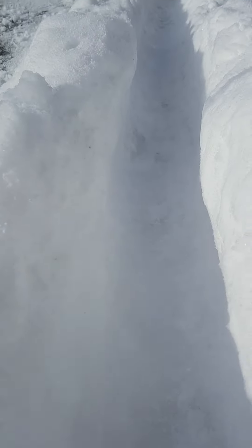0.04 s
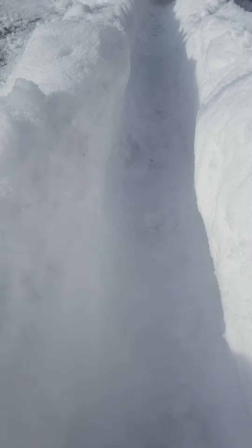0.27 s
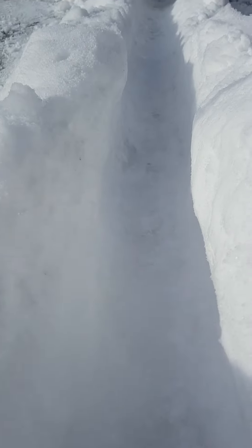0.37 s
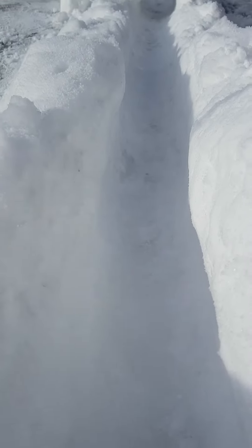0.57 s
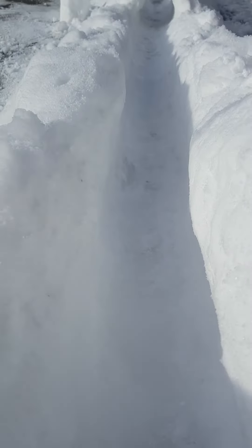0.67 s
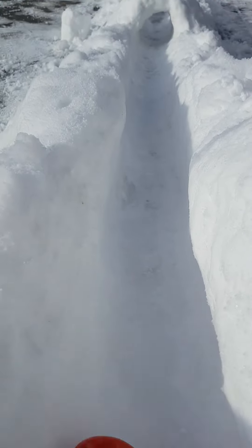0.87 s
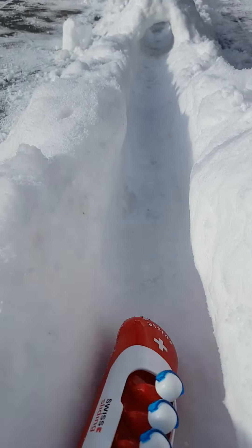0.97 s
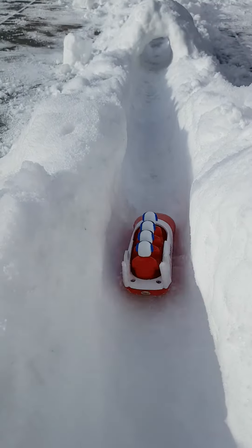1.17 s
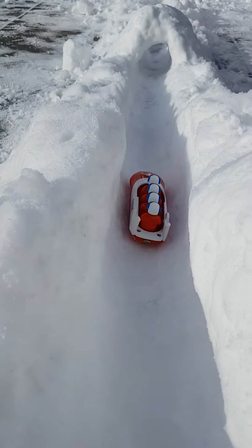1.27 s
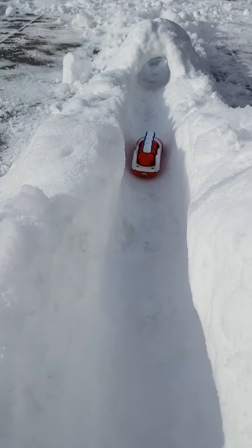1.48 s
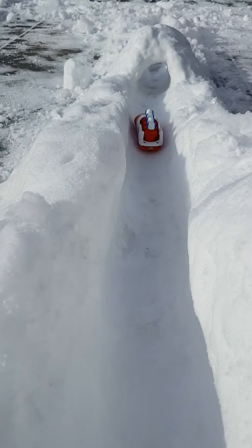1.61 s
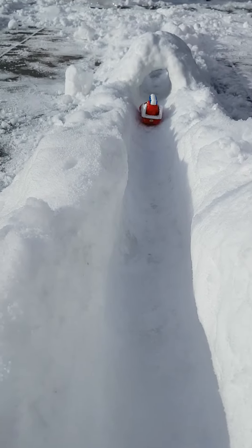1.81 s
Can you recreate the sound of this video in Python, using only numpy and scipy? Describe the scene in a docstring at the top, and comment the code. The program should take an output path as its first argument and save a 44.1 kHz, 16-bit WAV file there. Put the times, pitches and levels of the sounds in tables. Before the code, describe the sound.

A hollow plastic toy sled slides over icy snow, starting with a soft, low rumble and light bumps. From about 0.4 seconds, quick hollow knocks and plastic rattles grow louder. The gritty scraping and crunching peak around 0.8 to 1.1 seconds as it passes close by, with a few sharp clicks. It then fades away with sparser, softer bumps until about 1.8 seconds, over faint outdoor air.

```python
"""In an icy snow chute outdoors, a hollow plastic toy bobsled slides down, passes close by and runs away.
Each bump in the ice is an impact: it excites the damped modes of the hull, clacks the loose riders
and crushes a few crystals. Between bumps, friction over the grains makes the runners scrape.
The snow walls scatter a brief, dull echo, and faint open-air noise lies behind."""
import sys
import numpy as np
from scipy import signal
from scipy.fft import rfft, irfft, next_fast_len
from scipy.io import wavfile
from scipy.ndimage import map_coordinates

SR = 44100
rng = np.random.default_rng(int(sys.argv[2]) if len(sys.argv) > 2 else 0)


def int16_out(signal):
    """Quantize to a 16-bit WAV file."""
    q = np.round(np.clip(np.atleast_2d(signal).T, -1, 1) * 32767)
    wavfile.write(sys.argv[1], SR, q.astype(np.int16))


N = 81585

# bumps in the ice
# (time [s], knock pitch [Hz], hull thud [dB], hull knock [dB], riders' clack [dB], ice crunch [dB])
ICE_BUMPS = [(0.0527, 570, -34, -40, -61, -77), (0.1323, 596, -33.5, -34.5, -72, -87.5),
             (0.2111, 646, -33.5, -28.5, -51, -74), (0.2374, 613, -25, -24, -42, -63),
             (0.3115, 647, -39, -37.5, -40.5, -57.5), (0.3275, 600, -24, -31, -38.5, -58.0),
             (0.3513, 670, -33, -31, -47, -66), (0.4002, 637, -20, -24.5, -33, -48),
             (0.4448, 663, -19.5, -14.5, -32.5, -45), (0.4900, 622, -17.5, -17, -32.5, -48),
             (0.5068, 624, -23, -30, -68, -78), (0.5359, 636, -14, -12, -26.5, -40.5),
             (0.576, 686, -17, -17.5, -32, -45), (0.5871, 650, -20.5, -24, -44, -50),
             (0.5997, 583, -28.5, -52, -40.5, -56), (0.6117, 605, -25, -47, -45, -56),
             (0.6393, 658, -27, -22.0, -42, -58), (0.6598, 620, -28, -56, -53, -62),
             (0.672, 678, -21.5, -15, -33.5, -47.0), (0.6889, 685, -22, -16, -35, -46.5),
             (0.7094, 597, -29, -19, -34, -42.5), (0.7797, 584, -25.5, -16, -34.5, -37),
             (0.8083, 626, -67, -26, -53, -53), (0.8467, 690, -31, -29, -41, -68),
             (0.8541, 682, -23, -20.5, -36, -36), (0.8667, 633, -30, -24.5, -31.5, -40.5),
             (0.8975, 690, -26, -21, -30, -46), (0.9088, 740, -24.5, -26.5, -34, -41),
             (0.9463, 630, -30, -23.5, -40, -52), (0.9578, 703, -23.5, -26.5, -18.5, -32.5),
             (0.9786, 588, -24, -33, -26, -47), (0.9904, 815, -34, -29, -60, -37.5),
             (1.0158, 720, -17.5, -12.5, -18.5, -35.0), (1.0243, 693, -64, -14, -25, -58),
             (1.0538, 803, -51, -27, -32.5, -44), (1.063, 685, -44, -26.5, -35, -43),
             (1.1053, 750, -20.5, -13, -25.5, -35), (1.1124, 691, -25, -13, -25.5, -38.5),
             (1.1456, 635, -42, -14, -21, -39.5), (1.1593, 712, -26, -48, -34.5, -37.5),
             (1.2219, 680, -54, -33, -28, -40), (1.2367, 602, -58, -24, -30.5, -45),
             (1.2497, 564, -35.5, -32.5, -38, -48.5), (1.264, 664, -34, -26, -38.5, -44.5),
             (1.3233, 665, -36, -34, -60, -53), (1.4224, 656, -37, -29.5, -41.5, -61),
             (1.4311, 624, -40, -23, -36.5, -47.5), (1.4746, 662, -35, -25.5, -42, -55),
             (1.5388, 602, -40, -26.5, -37, -52), (1.7075, 622, -35, -28, -34, -47),
             (1.7373, 652, -40, -36, -42, -59), (1.7753, 684, -41, -33, -50, -64)]
# ice chips that crack under a runner, often just ahead of a bump (time [s], level [dB])
ICE_CHIPS = [(0.4005, -51), (0.4655, -58), (0.486, -55), (0.5345, -49), (0.7685, -48), (0.779, -42.5),
             (0.797, -43.5), (0.874, -41.5), (0.921, -45), (0.9455, -42), (1.0130, -37.5), (1.0250, -33),
             (1.0985, -46.5), (1.1415, -46), (1.183, -51), (1.484, -62), (1.536, -54), (1.588, -50.5),
             (1.683, -52), (1.7065, -49.5)]
# hard bumps that make a plastic part ring (time [s], pitch [Hz], level [dB])
PLASTIC_SNAPS = [(0.3999, 1290, -31.5), (0.5365, 3530, -38.5), (0.778, 2700, -27.5), (1.0147, 4050, -28),
                 (1.1068, 1740, -28), (1.7069, 2720, -41.5)]
# hops, when the runners barely touch the ice (start [s], end [s])
RUNNER_HOPS = [(0.772, 0.779), (0.812, 0.847), (0.884, 0.897), (0.932, 0.945), (0.966, 0.977),
               (0.997, 1.013), (1.074, 1.098), (1.127, 1.141), (1.366, 1.419), (1.615, 1.705)]
# the sled's bearing (time [s], left minus right [dB], left lag [ms])
SLED_BEARING = [(0, 1, -0.27), (.55, -1, 0.022), (.85, -4.5, 0.23), (1.02, -3.6, -0.051),
                (1.15, -2.5, -0.065), (1.25, -0.7, -0.23), (1.85, 3, -0.39)]

# hull modes of the flexing floor and the side walls (frequency [Hz], level [dB], 60 dB decay time [s])
FLOOR_MODES = [(410, 0, 0.015)]
WALL_MODES = [(573, 2.5, 0.017), (639, 4.5, 0.027), (765, -1.5, 0.02), (951, -16.5, 0.041)]

# noise spectra (frequency [Hz], spectral density [dB])
CLACK_SPECTRUM = [(400, -47.5), (800, 6.5), (1250, 0.5), (2050, 3), (2650, -2), (3300, -5), (5200, -16),
                  (8000, -36.5)]  # riders, and the runners' rasp
ICE_SPECTRUM = [(2000, -21), (4500, 4), (6200, 3), (8000, -2.5), (9300, -7), (12000, 0), (15500, -0.5)]  # crunch and hiss
RUMBLE_SPECTRUM = [(60, -22.5), (220, -16.5), (320, -4.5), (420, -5), (640, 2), (800, -8), (1100, -17.5)]  # hull under friction
DRONE_SPECTRUM = [(60, -6.5), (165, 6), (270, 9), (360, -5)]  # the hull drones lower while slow and far up the chute
AIR_SPECTRUM = [(25, -48), (50, -12), (75, 0.5), (200, -7), (1000, -6.5), (2500, -14), (5000, -31.5),
                (9000, -38.5), (12500, -49), (16000, -28)]

# envelopes of the four friction noises and of the open air (time [s], level [dB])
RUMBLE_ENVELOPE = [(0, -38.5), (.3, -47.5), (.42, -38.5), (.6, -35), (.74, -33), (.95, -30.5),
                   (1.07, -32.5), (1.2, -39.5), (1.5, -45), (1.85, -47.5)]
DRONE_ENVELOPE = [(0, -52), (0.056, -34.5), (.1, -47), (1.0, -61)]
RASP_ENVELOPE = [(0, -73), (.3, -50), (.42, -48), (.62, -41.5), (.76, -38.5), (.87, -29), (1.03, -45.5),
                 (1.25, -43.5), (1.4, -49), (1.85, -58)]
HISS_ENVELOPE = [(0, -63), (.3, -69.5), (.45, -60), (.62, -50.5), (.75, -45), (.87, -37), (1.02, -51.5),
                 (1.35, -55.5), (1.45, -60), (1.85, -68)]
AIR_ENVELOPE = [(0, -49.5), (.6, -49.5), (1.3, -51.5)]

DETUNE = .035  # relative standard deviation of a mode's frequency


def sled():
    """Superposition: impacts and friction sound together in the hull, the riders and the ice."""
    hull, riders, ice = impacts()
    crust = crumbling()
    hull += scrape(RUMBLE_SPECTRUM, RUMBLE_ENVELOPE, pressure=crust + 1, smooth=0.45)
    hull += scrape(DRONE_SPECTRUM, DRONE_ENVELOPE, pressure=crust + 1, smooth=0.69)
    riders += snaps()
    riders += scrape(CLACK_SPECTRUM, RASP_ENVELOPE, pressure=crust + 0.3, smooth=0.49)
    ice += scrape(ICE_SPECTRUM, HISS_ENVELOPE, pressure=crust + 0.74, smooth=0.51)
    stereo = spread(hull, width=0.014) + spread(riders, width=0.51, pan_db=-1.76)
    stereo += spread(ice, width=0.82, pan_db=5.5)
    return pass_by(*stereo)


def impacts():
    """Impulse excitation: hull, riders and ice answer each bump; a chip's tick is shorter."""
    hull, riders, ice = np.zeros((3, 2, N))
    floor = dict(modes=FLOOR_MODES, attack_s=0.0022, cut_hz=210)
    walls = dict(modes=WALL_MODES, attack_s=0.0017, cut_hz=450)
    for s, hz, thud_db, knock_db, clack_db, crunch_db in ICE_BUMPS:
        stretch = hz / 650  # the spot struck shifts the knock from its nominal 650 Hz
        add(hull, s, hull_ring(**floor, stretch=stretch), thud_db)
        add(hull, s, hull_ring(**walls, stretch=stretch), knock_db)
        add(riders, s, contacts(CLACK_SPECTRUM, attack_s=0.00011, t60=0.031, scatter_db=-1), clack_db)
        add(ice, s, contacts(ICE_SPECTRUM, attack_s=0.00034, t60=0.03, scatter_db=1), crunch_db)
    for s, db in ICE_CHIPS:
        add(ice, s, contacts(ICE_SPECTRUM, attack_s=0.00011, t60=0.017, scatter_db=2), db)
        add(riders, s, contacts(CLACK_SPECTRUM, attack_s=0.00011, t60=0.017, scatter_db=3), db + 5.5)
        add(hull, s, hull_ring(**walls), db + 14.5)
    return hull, riders, ice


def hull_ring(modes, attack_s, cut_hz, stretch=1, scatter_db=2):
    """Free vibration: the struck hull rings in damped modes; so small a body radiates little bass."""
    t = np.arange(SR // 12) / SR
    ring = np.zeros((2, len(t)))
    for hz, db, t60 in modes:
        tuning, strength = rng.standard_normal((2, 2, 1))
        mode_hz = hz * stretch * (1 + DETUNE * tuning)
        ring += amp(db + scatter_db * strength - 60 * t / t60) * np.sin(2 * np.pi * mode_hz * t)
    radiation = signal.butter(2, cut_hz, "high", fs=SR, output="sos")
    return signal.sosfilt(radiation, -ring * (1 - np.exp(-t / attack_s)))


def contacts(spectrum, attack_s, t60, scatter_db):
    """Incoherent summation: a cluster of tiny hard contacts merges into a decaying burst of noise."""
    t = np.arange(SR // 12) / SR
    noise = rng.standard_normal((2, len(t)))
    flicker = np.repeat(rng.standard_normal(len(t)), SR // 2000)[:len(t)]  # half-millisecond steps
    envelope = (1 - np.exp(-t / attack_s)) * amp(scatter_db * flicker - 60 * t / t60)
    return coloured(noise * envelope, spectrum)


def snaps(t60=0.02):
    """Damped resonance: a stiff plastic part rings briefly, its mid and side slightly detuned."""
    track = np.zeros((2, N))
    t = np.arange(SR // 20) / SR
    for s, hz, db in PLASTIC_SNAPS:
        pair_hz = hz * (1 + DETUNE * rng.standard_normal((2, 1)))
        add(track, s, np.sin(2 * np.pi * pair_hz * t) * amp(-60 * t / t60), db)
    return track


def scrape(spectrum, envelope, pressure, smooth, grains_per_s=2500):
    """Sliding friction: ice grains tick over smooth noise, louder as the runners press harder."""
    grains = (rng.random(N) < grains_per_s / SR) * rng.standard_normal((2, N))
    friction = (unit(grains) + smooth * rng.standard_normal((2, N))) * pressure
    return unit(coloured(friction, spectrum)) * amp(curves(envelope)[0]) * runner_contact()


def crumbling(breaks_per_s=150, decay_s=.004, scatter_db=3.5):
    """Brittle fracture: the crust gives way in tiny collapses, each a sudden, fast-dying pulse."""
    breaks = rng.random(N) < breaks_per_s / SR
    sizes = amp(scatter_db * np.clip(rng.standard_normal(N), -2, 2))
    return unit(signal.lfilter([1], [1, -np.exp(-1 / (decay_s * SR))], breaks * sizes))


def runner_contact(hop_db=-8.5, ramp_s=0.00084):
    """Friction needs load: its gain dips in each hop, when the runners barely touch the ice."""
    t = np.arange(N) / SR
    aloft = sum(np.clip(np.minimum(t - start, end - t) / ramp_s, 0, 1) for start, end in RUNNER_HOPS)
    return amp(hop_db * aloft)


def pass_by(left, right):
    """Localisation: differences of level and arrival time between the channels give the bearing."""
    pan_db, lag_ms = curves(SLED_BEARING)
    half_lag = lag_ms * SR / 2000  # samples
    left = map_coordinates(left, [np.arange(N) - half_lag], order=5)
    right = map_coordinates(right, [np.arange(N) + half_lag], order=5)
    return np.array([left * amp(pan_db / 2), right * amp(-pan_db / 2)])


def chute_echo(sound, gain_db=-12.5, attack_s=0.0069, t60=0.079, top_hz=2800):
    """Scattering and absorption: the snow walls return a brief, weak echo and swallow its treble."""
    t = np.arange(SR // 6) / SR
    tail = rng.standard_normal((2, len(t))) * amp(-60 * t / t60) * (1 - np.exp(-t / attack_s))
    absorption = signal.butter(2, top_hz, fs=SR, output="sos")
    tail = signal.sosfilt(absorption, tail / np.linalg.norm(tail[0]))
    return amp(gain_db) * signal.fftconvolve(sound, tail, axes=1)[:, :N]


def open_air():
    """Ambient noise: a faint outdoor background, partly correlated between left and right."""
    noise = unit(coloured(rng.standard_normal((2, N)), AIR_SPECTRUM))
    return spread(noise, width=0.62) * amp(curves(AIR_ENVELOPE)[0])


def amp(db):
    """Amplitude ratio for a level in decibels."""
    return 10 ** (np.asarray(db) / 20)


def unit(x):
    """Normalisation to an rms of 1."""
    return x / np.sqrt(np.mean(x ** 2) + 1e-20)


def curves(rows):
    """Linear interpolation: one value per sample for each column after the time."""
    times, *columns = np.transpose(rows)
    return [np.interp(np.arange(N) / SR, times, column) for column in columns]


def coloured(x, spectrum, skirt_db_per_octave=15):
    """Minimum-phase filtering: x takes the given spectrum, falling away above its last point."""
    size = 4096
    hz, db = np.transpose(spectrum)
    octave = np.log2(np.fft.rfftfreq(size, 1 / SR) + 1)
    skirt_db = skirt_db_per_octave * np.maximum(octave - np.log2(hz[-1]), 0)
    shape_db = np.interp(octave, np.log2(hz), db) - skirt_db
    cepstrum = irfft(np.log(amp(shape_db)))
    cepstrum[1:size // 2] *= 2  # folding onto positive time makes the filter causal
    cepstrum[size // 2 + 1:] = 0
    response = irfft(np.exp(rfft(cepstrum)))
    return signal.fftconvolve(x, response[None], axes=1)[:, :x.shape[1]]


def spread(pair, width, pan_db=0):
    """Sum and difference: mid and side become left and right; width is the gain of the side."""
    mid, side = pair[0], width * pair[1]
    return np.array([mid + side, mid - side]) * amp([[pan_db / 2], [-pan_db / 2]])


def add(track, s, blow, db, onset_s=.008):
    """Superpose a blow on a track at time s; db is the rms level of its mid signal over the onset."""
    start = round(s * SR)
    onset_rms = np.sqrt(np.mean(blow[0, :int(onset_s * SR)] ** 2) + 1e-20)
    part = track[:, start:start + blow.shape[1]]
    part += amp(db) * blow[:, :part.shape[1]] / onset_rms


def scene():
    """The sound field is the sum of the sled's direct sound, its echo and the ambient noise."""
    direct = sled()
    return direct + chute_echo(direct) + open_air()


def record(dry, ceiling=.97, top_hz=15950):
    """Saturation and band limiting: the highest peaks are rounded and the top treble is removed."""
    rounded = dry / (1 + (dry / ceiling) ** 8) ** (1 / 8)
    size = next_fast_len(N + SR // 2)
    passband = np.fft.rfftfreq(size, 1 / SR) < top_hz
    return irfft(rfft(rounded, size) * passband, size)[:, :N]


dry = scene()
out = record(dry)
int16_out(out)
```